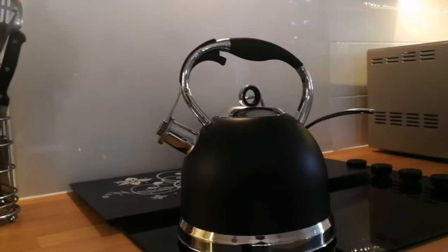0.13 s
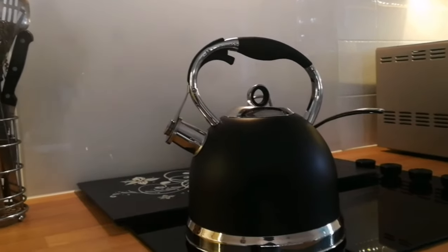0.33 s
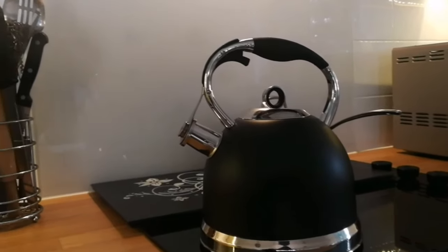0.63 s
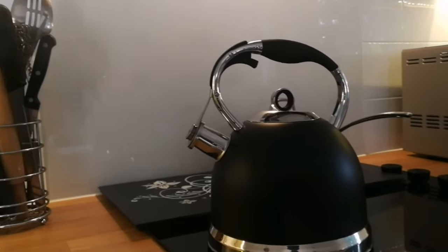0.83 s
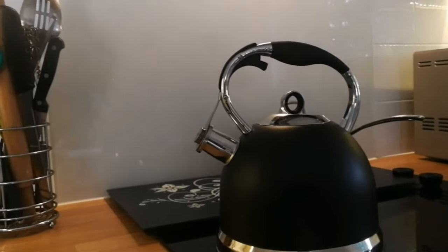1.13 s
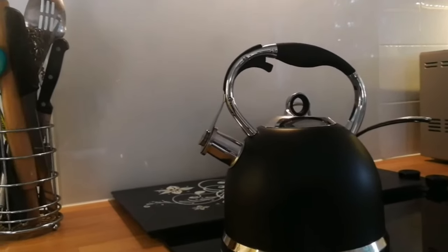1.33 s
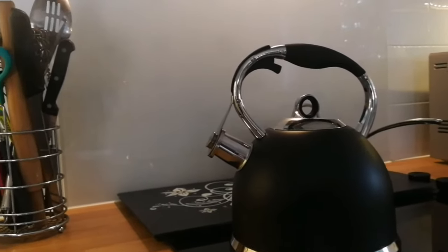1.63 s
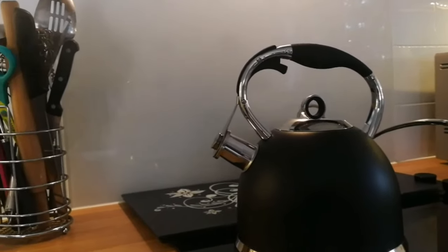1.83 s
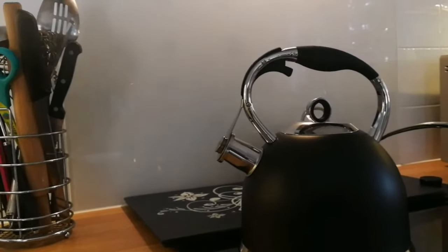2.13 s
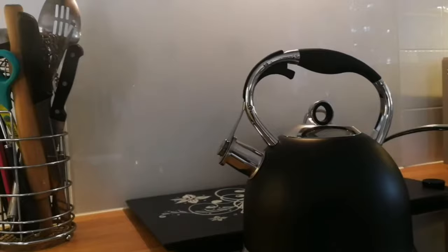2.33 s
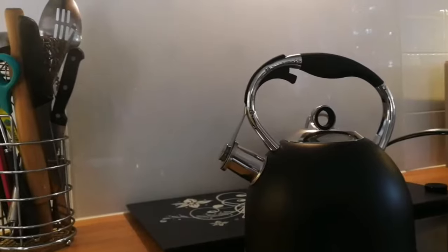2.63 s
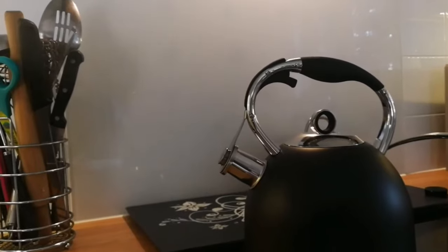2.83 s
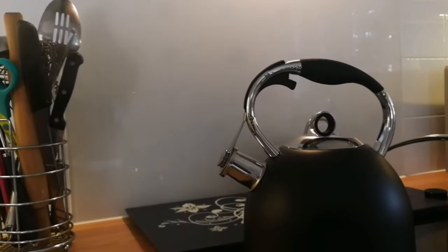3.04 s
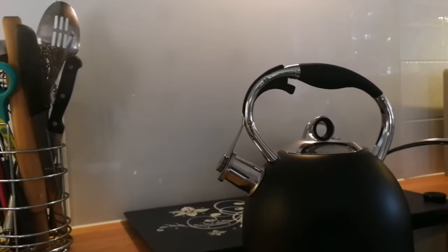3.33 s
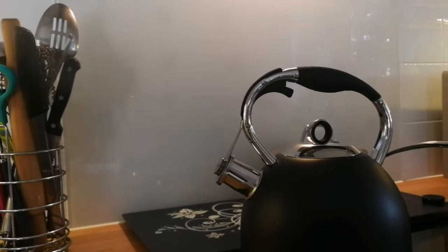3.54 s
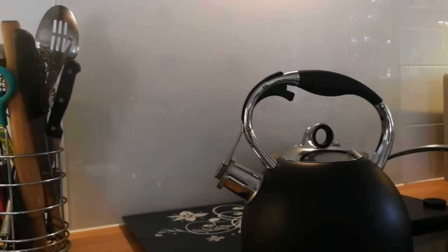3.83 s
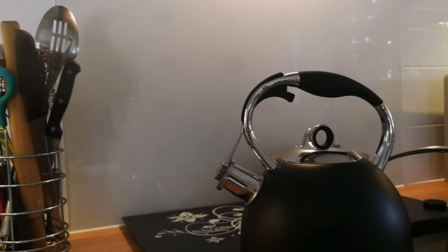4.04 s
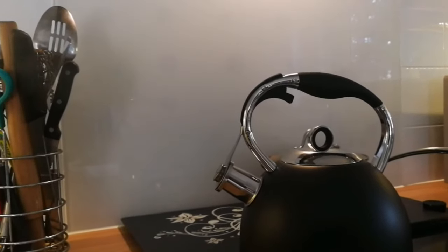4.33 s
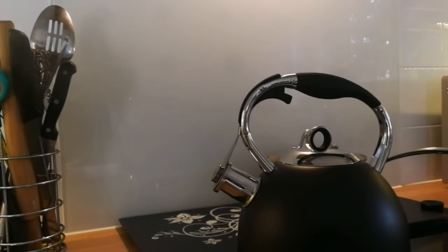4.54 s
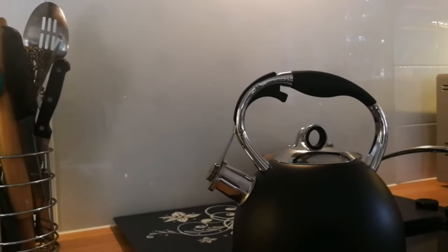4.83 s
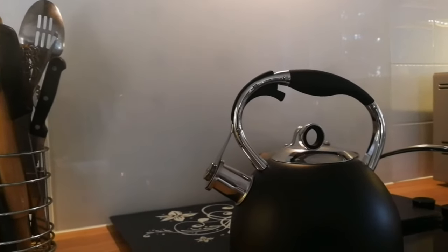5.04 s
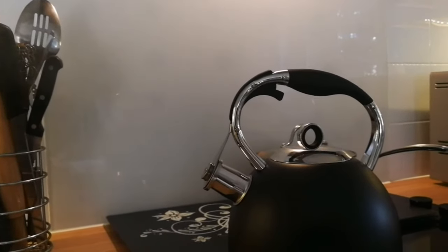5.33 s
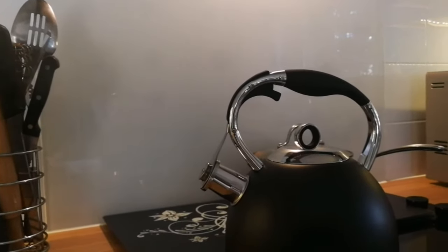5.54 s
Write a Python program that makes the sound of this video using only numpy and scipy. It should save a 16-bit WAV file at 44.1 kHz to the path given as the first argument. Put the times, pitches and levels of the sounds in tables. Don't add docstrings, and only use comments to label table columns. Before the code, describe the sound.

Piercing kettle whistle, already sounding and never stopping, its pitch trembling and beating off kitchen walls, with weak steam hiss and low rumble beneath.

```python
import sys
import numpy as np
from scipy import signal
from scipy.fft import rfft, irfft, next_fast_len
from scipy.io import wavfile
from scipy.ndimage import uniform_filter1d

SR = 44100
rng = np.random.default_rng(int(sys.argv[2]) if len(sys.argv) > 2 else 0)


def dump_mix(stems):
    frames = np.atleast_2d(stems).T
    limited = np.clip(frames, -1, 1)
    pcm = np.round(limited * 32767).astype(np.int16)
    wavfile.write(sys.argv[1], SR, pcm)


def volts_from_decibels(level):
    exponent = np.asarray(level, float) / 20
    return 10 ** exponent


N = 250488
FRAME, HOP = 2048, 512

# [t/s, f/Hz]
RESTING_PITCH = [(0.0, 3977), (0.75, 3956), (1.05, 3892), (1.5, 3984), (2.6, 3966), (2.87, 3950),
                 (3.75, 3962), (4.3, 3939), (4.53, 3901), (5.0, 3944), (5.2, 3907), (5.68, 3928)]
# [t/s, pitch lift f/Hz]
STEAM_SURGES = [(0.041, 30.4), (0.388, 17.7), (0.634, 15.5), (0.874, 51.7), (0.945, 47), (1.182, 85),
                (1.283, 47.6), (1.463, 70.6), (1.583, 46.3), (1.668, 115.4), (1.812, 43), (2.051, 48),
                (2.172, 41), (2.326, 76), (2.508, 41.3), (2.667, 53), (2.744, 28.6), (3.02, 29.4),
                (3.3, 117.6), (3.513, 31.4), (3.629, 11.46), (3.893, 143), (4.03, 66.4), (4.152, 120.6),
                (4.339, 57.5), (4.434, 50.6), (4.768, 54.4), (5.08, 41), (5.321, 91.7), (5.535, 27)]
# [t/s, fast pitch jitter f/Hz]
JET_FRAY = [(0, 5), (.9, 5.8), (1.1, 11.3), (1.3, 7), (1.45, 23.1), (1.75, 14.5), (1.95, 8.5), (2.6, 9.2),
            (3.2, 4.76), (3.55, 11.6), (3.9, 6.7), (4.35, 10.7), (4.6, 6.9), (5.15, 6.1), (5.3, 16),
            (5.68, 8.1)]
# [t/s, tone level/dB, tone left-right level/dB, octave level/dB, octave left-right level/dB]
CAMERA_DRIFT = [(0.0, 0, 14.5, -3.5, -2.5), (0.3, 4, -4, -1.3, 2.5), (0.7, -0.4, 3.5, 2.5, 14.5),
                (1.1, -1.3, 3.8, -0.5, -5), (1.6, -4.5, 3.3, 0.5, -5.5), (2.2, -2, -3, -3.1, 0.2),
                (2.8, -1.4, -6, -1.5, -4.5), (3.2, -1, -1.2, -0.8, -2.5), (3.7, -1.2, -1.6, -0.2, 0),
                (4.1, 1.4, 1.5, 0, -1.5), (4.5, -2.4, -1, 2.6, 3), (5.0, 1.5, -1.5, -1, 7),
                (5.3, -1.4, -4, 2.5, 10.5), (5.68, 2, -1, 2.8, 1)]
STANDING_PITCH = [3915, 3940, 3960, 3980, 4000, 4025, 4055, 4100]
# [tone level/dB, tone left-right level/dB, octave level/dB, octave left-right level/dB]
STANDING_WAVES = [(-25.5, -6.5, -36, 1.5), (-29.5, -9, -37, 1.5), (-26, -3.5, -34.5, -6),
                  (-29, 0.5, -33.5, 5.5), (-28.5, 6.5, -32, 9), (-29.5, -4.5, -31, 8),
                  (-26, -8.5, -27.5, 5.5), (-22, -9.5, -26, 1.5)]
# [multiple of the pitch, level against the octave/dB, left-right level/dB]
UPPER_OVERTONES = [
    (3, -14.5, 5.5),
    (4, -35, 5),
]
# [f/Hz, level/dB per Hz]
JET_SPECTRUM = [(2500, -74), (3400, -6.5), (4300, -3.5), (5000, -11.5), (5800, -6.5), (7000, -5.5),
                (8600, -1.5), (9500, -6), (11500, -12), (12700, -12), (13300, -24), (16000, -39)]
# [f/Hz, level/dB per Hz]
ROOM_SPECTRUM = [(12, -55), (20, 0), (75, -14), (140, -6.5), (188, -14), (219, -12.5), (336, -12),
                 (453, -20.5), (514, -16.5), (637, -25), (1130, -18), (2150, -22.5), (3300, -18.5),
                 (4290, -64), (7260, -120)]
# [f/Hz, left-right correlation]
PORT_LIKENESS = [(60, 0.95), (180, 1), (550, 0.2), (1650, 0.13), (4970, -0.026), (15000, -0.02)]
# [f/Hz, width f/Hz, level/dB, level/dB per unit of pressure]
RESONANCES = [
    (146, 10, -71, 0),
    (221, 6, -73, 0),
    (2878, 18, -75, -10),
    (3445, 12, -72, -4),
    (4540, 35, -71, 4),
    (8550, 60, -70, 5),
]
# [t/s, peak level/dB, f/Hz]
HAND_BUMPS = [
    (0.216, -39, 100),
    (4.376, -47.5, 40),
]
# [from f/Hz, to f/Hz, level under the tone/dB]
HIDDEN_BANDS = [
    (3500, 3800, 48),
    (4220, 4750, 43),
    (4750, 5300, 48),
    (12500, 15830, 52),
]


def evened(x):
    return x / np.sqrt(np.mean(x ** 2) + 1e-20)


def read(points, hz):
    f, value = np.transpose(points)
    return np.interp(np.log(hz + 1), np.log(f + 1), value)


def columns(rows, t):
    s, *values = np.transpose(rows)
    return [np.interp(t, s, v) for v in values]


def drift(hz, length):
    size = next_fast_len(length)
    f = np.fft.rfftfreq(size, 1 / SR)
    slope = (f > 0) / (1 + (f / hz) ** 2.5)
    return evened(irfft(rfft(rng.standard_normal(size)) * slope, size)[:length])


def pair(db, lean_db):
    return volts_from_decibels(np.array([db + lean_db / 2, db - lean_db / 2]))


def noise(field_db, same, patchy_db):
    frames = N // HOP + 5
    a, b, c, d, patches = rng.standard_normal((frames, FRAME // 2 + 1, 5)).T
    patches = uniform_filter1d(patches, size=20, axis=0)
    patches = evened(uniform_filter1d(patches, size=7, axis=1))
    left = a + 1j * b
    right = same * left + np.sqrt(1 - same ** 2) * (c + 1j * d)
    z = np.array([left, right]) * volts_from_decibels(field_db + patchy_db * patches)
    return evened(signal.istft(z, nperseg=FRAME, noverlap=FRAME - HOP)[1][:, :N])


def pitch(t):
    lag_s = 0.018
    rise_s, fall_s = 0.042, 0.072
    coarse = np.arange(t[0], t[-1] + 0.01, 0.004)
    s, lift_hz = np.transpose(STEAM_SURGES)
    u = coarse[:, None] - s + lag_s
    shape = np.exp(-(abs(u) / np.where(u < 0, rise_s, fall_s)) ** 1.4)
    surge_hz = 1.03 * shape @ lift_hz
    return columns(RESTING_PITCH, t + lag_s)[0] + np.interp(t, coarse, surge_hz)


def pressure(t):
    return (pitch(t) - 3985) / 100


def kitchen(x, t60, gap_s, shared):
    t = np.arange(SR // 2) / SR
    taps = rng.choice([-1., 1.], (3, len(t))) * (rng.random((3, len(t))) < 0.06)
    taps = (taps[:2] + shared * taps[2]) * volts_from_decibels(-60 * t / t60) * (t > gap_s)
    taps = taps / np.linalg.norm(taps, axis=1)[:, None]
    return signal.fftconvolve(x[None], taps, axes=1)[:, :len(x)]


def settled(x):
    size = int(0.28 * SR)
    power = uniform_filter1d(uniform_filter1d(x ** 2, size), size)
    return x / (abs(power) + 1e-3) ** (0.71 / 2)


def whistle():
    lead = SR // 2
    t = (np.arange(N + lead) - lead) / SR
    turbulence_hz = 12 * drift(20.1, len(t)) + columns(JET_FRAY, t)[0] * drift(62, len(t))
    phase = 2 * np.pi * np.cumsum(pitch(t) + turbulence_hz) / SR
    flutter = 1 + 0.062 * drift(96, len(t))
    standing = columns(np.c_[STANDING_PITCH, STANDING_WAVES], pitch(t - 0.018))
    tone_db, tone_lean, octave_db, octave_lean = np.add(columns(CAMERA_DRIFT, t), standing)
    # multiple, port gains, share of echo, decay t60/s
    voices = [(1, pair(tone_db, tone_lean), 0.55, 0.26), (2, pair(octave_db, octave_lean), 1.0, 0.22)]
    mean_db = np.mean(octave_db)
    upper_db = mean_db + 0.12 * (octave_db - mean_db)
    for k, db, lean in UPPER_OVERTONES:
        voices.append((k, pair(db + upper_db, lean), 0.65, 0.16))
    out = 0
    for k, gains, wet, t60 in voices:
        sine = np.sqrt(2) * flutter * np.sin(k * phase)
        direct = np.array([np.roll(sine, shift=3), sine])
        echoes = kitchen(sine, t60, gap_s=0.004, shared=0.47 / k ** 1.8)
        out = out + gains * settled(np.sqrt(1 - wet) * direct + np.sqrt(wet) * echoes)
    return volts_from_decibels(-0.24) * out[:, lead:]


def jet_hiss():
    hz = np.fft.rfftfreq(FRAME, 1 / SR)[:, None]
    t = np.arange(N // HOP + 5) * HOP / SR
    gusts = uniform_filter1d(rng.standard_normal(len(t)), size=3)
    flicker_db = 2.2 * pressure(t) + 7.7 * np.tanh(2.8 * gusts)
    field_db = read(JET_SPECTRUM, hz) + pressure(t) + (hz > 12500) * flicker_db
    return volts_from_decibels(-52.5) * noise(field_db, same=0.039, patchy_db=1.97) * pair(0, 0.94)[:, None]


def room_tone():
    hz = np.fft.rfftfreq(FRAME, 1 / SR)[:, None]
    field_db = read(ROOM_SPECTRUM, hz) - 60 * (hz > 3400)
    return volts_from_decibels(-59.5) * noise(field_db, read(PORT_LIKENESS, hz), patchy_db=1.6)


def rings():
    size = next_fast_len(N)
    f, out = np.fft.rfftfreq(size, 1 / SR), 0
    push = uniform_filter1d(pressure(np.arange(N) / SR), size=6000)
    for hz, width, db, gain_db in RESONANCES:
        drive = rng.standard_normal((2, size))
        if hz < 500:
            drive = drive[[0, 0]]
        ring = irfft(rfft(drive) / (1 + ((f - hz) / width) ** 2), size)[:, :N]
        out = out + volts_from_decibels(db + gain_db * push) * evened(ring)
    return out


def handling():
    out, t = np.zeros(N), np.arange(SR // 5) / SR
    envelope = (1 - np.exp(-t / 0.0021)) * np.exp(-t / 0.018)
    for s, db, hz in HAND_BUMPS:
        out[round(s * SR):][:len(t)] += volts_from_decibels(db) * np.sin(2 * np.pi * hz * t) * envelope
    return out


def scene():
    return whistle() + jet_hiss() + room_tone() + rings() + handling()


def unmasked(x):
    hz, _, z = signal.stft(x, SR, nperseg=2048, noverlap=1024)
    tone = (abs(z[:, (hz > 3750) & (hz < 4200)]) ** 2).sum(axis=1).mean(axis=0)
    for low_hz, high_hz, under_db in HIDDEN_BANDS:
        bins = np.flatnonzero((hz > low_hz) & (hz < high_hz))
        for band in np.array_split(bins, 4):
            power = (abs(z[:, band]) ** 2).sum(axis=1)
            z[:, band] *= (power > tone * volts_from_decibels(-2 * under_db))[:, None]
    return signal.istft(z, SR, nperseg=2048, noverlap=1024)[1][:, :N]


def band_limit(x):
    return signal.sosfilt(signal.butter(12, 15830, fs=SR, output="sos"), x)


def record(dry):
    mix = unmasked(dry)
    return band_limit(mix)


dry = scene()
out = record(dry)
dump_mix(out)
```